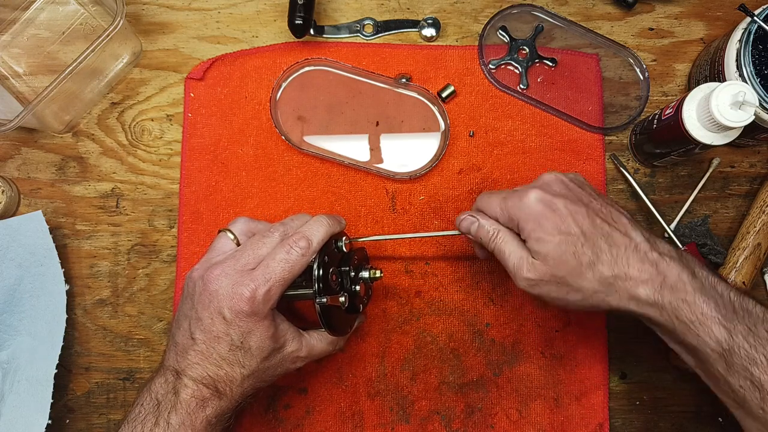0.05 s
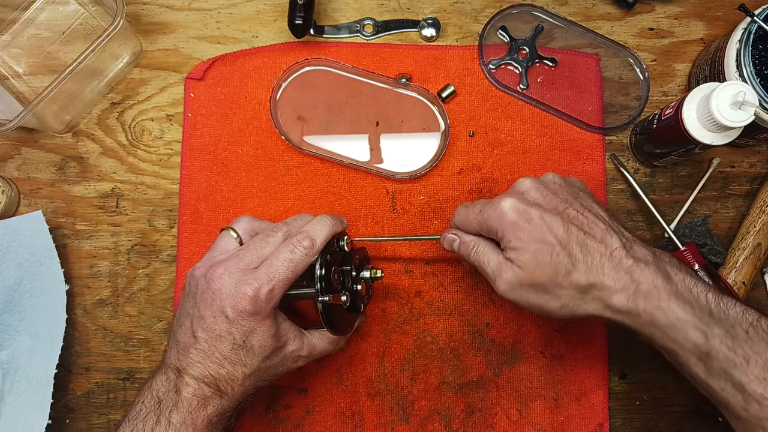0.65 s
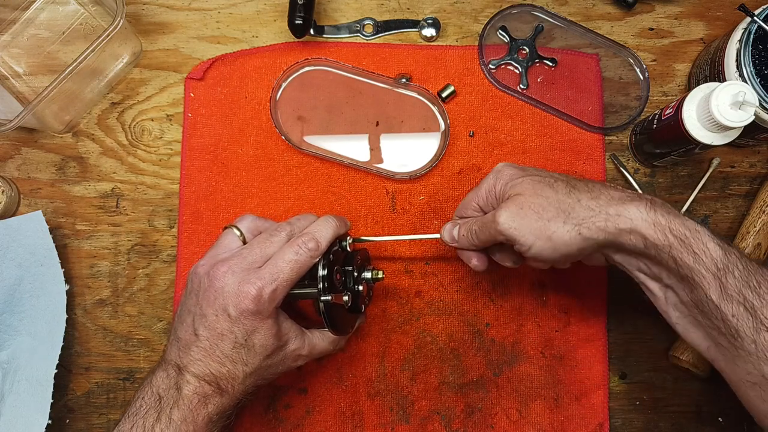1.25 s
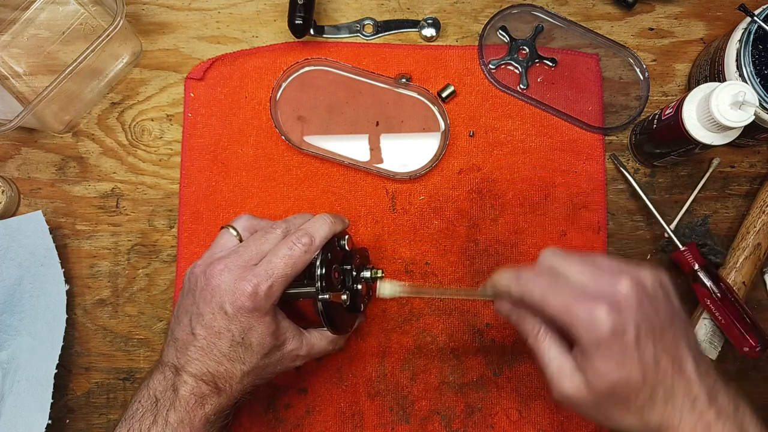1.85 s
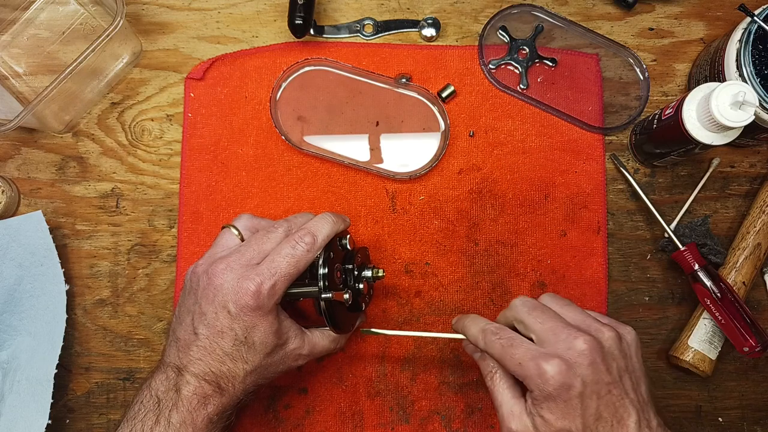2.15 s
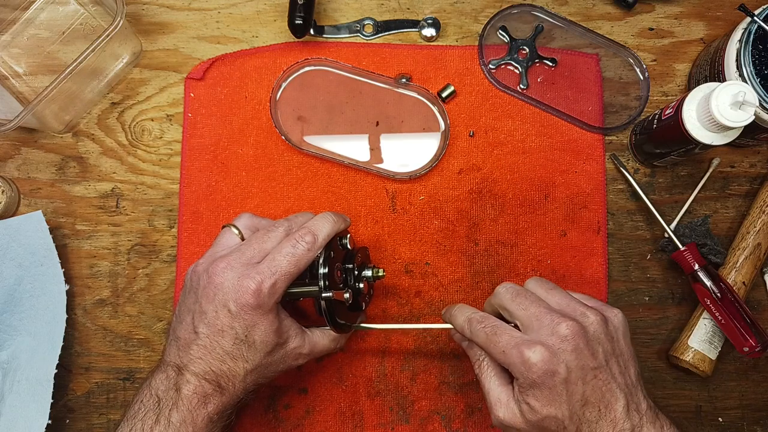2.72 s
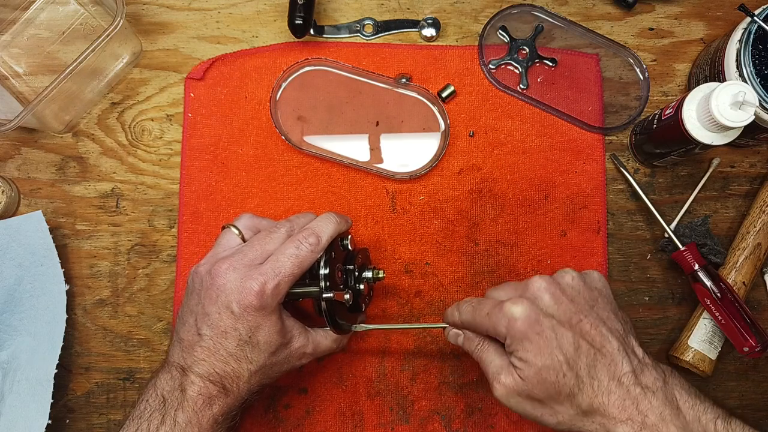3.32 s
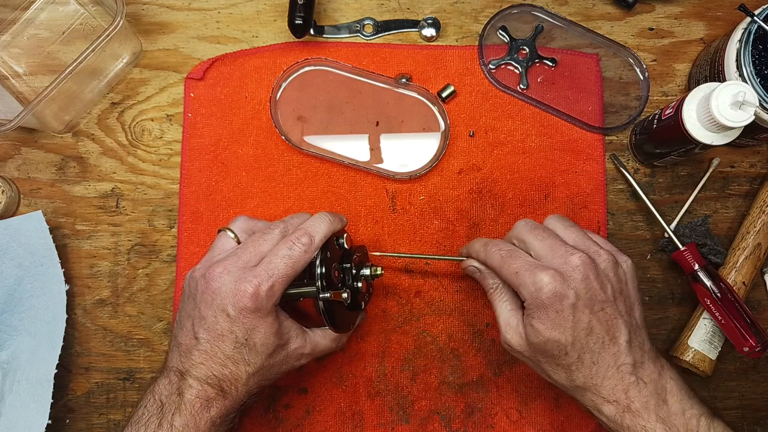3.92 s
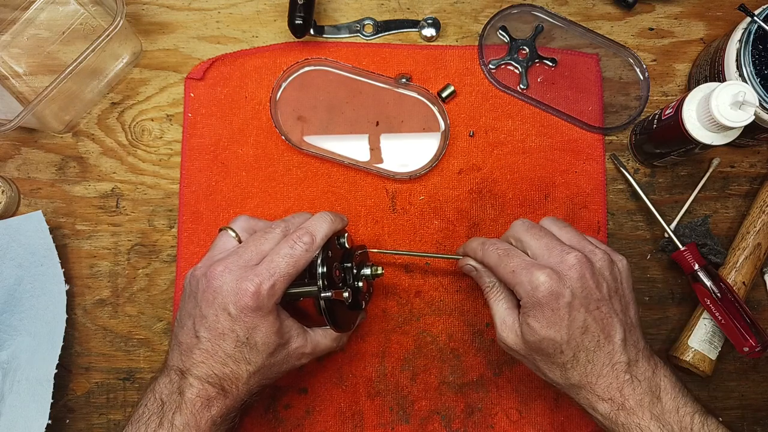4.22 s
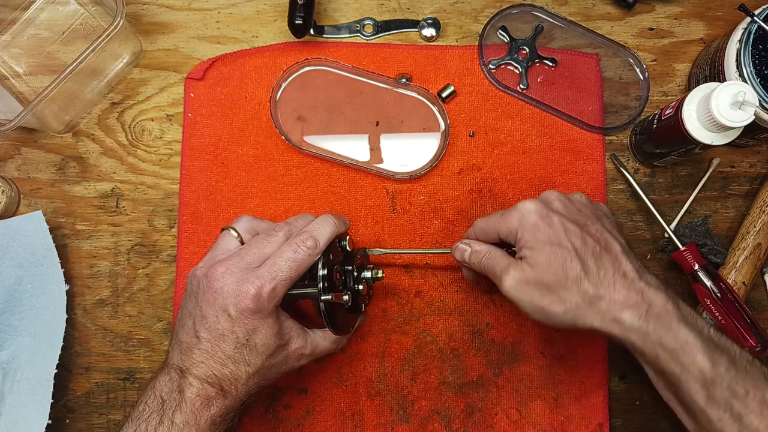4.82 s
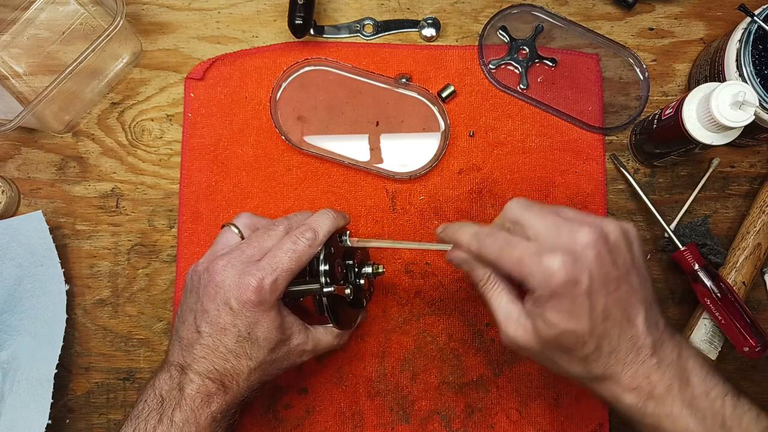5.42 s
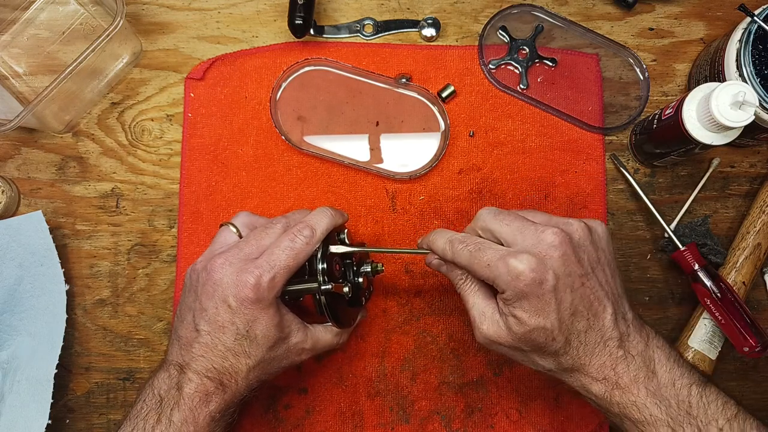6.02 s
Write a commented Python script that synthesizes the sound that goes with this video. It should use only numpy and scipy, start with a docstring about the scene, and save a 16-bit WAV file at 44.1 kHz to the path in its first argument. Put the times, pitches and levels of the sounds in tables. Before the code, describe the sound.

A fishing reel is cleaned with a thin swab stick at a wooden workbench, heard quietly through a close stereo microphone in a small dry room. In the first half second come a short rub and a few light metallic ticks. More ticks follow around 1.6 seconds, then a soft hand scuff and dull bench bump near 1.9. Small knocks land at about 2.4 and 2.7 seconds. Soft low bumps recur between 3 and 5 seconds, with a faint tick at 3.6. From 4.2 to 4.5 seconds, three firmer knocks make the reel ring briefly. The sharpest click comes near 5.7 seconds, followed by a short scrape and two more knocks by 6 seconds. Very faint thin squeaks occur near the start and end. Throughout, a low drone and rumble swell and sink under faint hiss and the slight slide of fingers.

```python
"""Screwdriver on a fishing reel

A wooden workbench in a small dry room, the reel on a cloth mat, a stereo microphone close by.
The small blade ticks on the screw heads and slips in their slots, knocking the reel into a short ring.
Hands and reel scuff softly, a dry thread squeaks, and the bench bumps as the hands shift their weight.
Underneath, a low drone and rumble swell and sink below the microphone's faint hiss."""
import sys
import numpy as np
from scipy import signal
from scipy.fft import rfft, irfft, next_fast_len
from scipy.io import wavfile
from scipy.ndimage import map_coordinates

SR = 44100
rng = np.random.default_rng(int(sys.argv[2]) if len(sys.argv) > 2 else 0)


def transcribe(u):
    """Save the signal u as a 16-bit wav file named by the first command-line argument.

    u: samples, shape (n,) or (channels, n), limited to [-1, 1]; the rate is SR.
    q: integer samples, one column per channel.
    """
    v = np.clip(np.atleast_2d(u).T, -1, 1)
    q = np.round(v * 32767).astype(np.int16)
    wavfile.write(sys.argv[1], SR, q)


N = 271656
TOP_HZ = 15830  # the recorder's band limit
# how alike the work sounds on left and right: (frequency [Hz], correlation [-1..1])
WORK_LIKENESS = [(300, 1), (650, 0.16), (1300, 0), (10000, 0)]


def amp(db):
    """Decibels to gain."""
    return 10 ** (np.asarray(db) / 20)


def unit(x):
    """x at rms 1."""
    return x / np.sqrt(np.mean(x ** 2) + 1e-20)


def along(points, hz):
    """(frequency [Hz], value) points read on a log axis."""
    f, v = np.transpose(points)
    return np.interp(np.log(hz + 1), np.log(f + 1), v)


def curve(rows):
    """(time [s], value) rows as one value per sample."""
    return np.interp(np.arange(N) / SR, *np.transpose(rows))


def wobble(rate, size):
    """A smooth random curve, rate knots a second."""
    return map_coordinates(rng.standard_normal(4096), [np.arange(size) * rate / SR], mode="wrap")


def filtered(x, response):
    """x through a filter whose gain is response(hz)."""
    size = x.shape[-1]
    padded = next_fast_len(size + 8192)
    return irfft(rfft(x, padded) * response(np.fft.rfftfreq(padded, 1 / SR)), padded)[..., :size]


def paired(x, likeness):
    """Two unrelated signals blended into left and right of a given correlation."""
    turn = lambda hz: np.arccos(np.clip(along(likeness, hz), -1, 1)) / 2
    mid, side = filtered(x, lambda hz: np.array([np.cos(turn(hz)), np.sin(turn(hz))]))
    return np.array([mid + side, mid - side])


def noise(colour, likeness, size):
    """Coloured stereo noise of rms 1."""
    coloured = filtered(rng.standard_normal((2, size)), lambda hz: amp(along(colour, hz)))
    return unit(paired(coloured, likeness))


def add(track, s, sound):
    """Mix a sound into the track at time s."""
    start = max(round(s * SR), 0)
    part = sound[:, :N - start]
    track[:, start:start + part.shape[1]] += part


def with_room(x, wet_db, build_s):
    """The direct sound and the small room's short tail, which builds up just behind it."""
    # the room's decay: (frequency [Hz], t60 [s])
    decay = [(150, 0.18), (500, 0.25), (2000, 0.26), (5000, 0.28), (12000, 0.2)]
    # the tail's spectrum: (frequency [Hz], gain [dB])
    colour = [(100, -7), (500, 5), (1800, 4.5), (4000, 0), (10000, -2.5)]
    hz, t, spectrum = signal.stft(rng.standard_normal((2, SR // 3)), SR, nperseg=256)
    fade = amp(along(colour, hz)[:, None] - 60 * t / along(decay, hz)[:, None])
    tail = signal.istft(spectrum * fade, SR, nperseg=256)[1]
    tail *= 1 - np.exp(-(np.arange(tail.shape[1]) / SR / build_s) ** 2)
    wet = signal.fftconvolve(x, tail / np.linalg.norm(tail[0]), axes=1)
    return x + amp(wet_db) * wet[:, :x.shape[1]]


def room_tone(drone_hz=72.07, waver_hz=3.96, throb_db=5, steady_db=-42, steadying_span_db=7.5):
    """A low drone that throbs more when weak, within a broad rumble and a dull, fluttering murk."""
    # swells of the three layers: (time [s], relative level [dB])
    drone_swell = [(0, -58), (0.22, -58.5), (0.35, -66), (1.0, -61), (1.3, -57.5), (1.45, -50), (1.9, -55),
                   (2.7, -54), (3.0, -54), (3.5, -48), (3.8, -57), (4.1, -47), (4.4, -58), (4.75, -62.5),
                   (5.1, -48.5), (5.32, -64), (5.45, -41.5), (6.16, -48)]
    rumble_swell = [(0, -63), (0.22, -57), (0.36, -68), (1.5, -61), (2.35, -60), (2.8, -54), (3.3, -53.5),
                    (3.85, -58.5), (4.1, -53), (4.4, -55), (4.7, -60.5), (5.25, -59), (5.7, -49),
                    (6.16, -55)]
    murk_swell = [(0.0, -79), (0.4, -84.5), (1.2, -82.5), (2.05, -75), (4.0, -75.5), (4.5, -70), (4.7, -81),
                  (5.35, -81), (6.0, -70), (6.16, -79)]
    # spectra of the two noises: (frequency [Hz], relative density [dB])
    rumble_colour = [(12, -15.5), (25, -11.5), (50, 2.5), (70, -0.5), (90, -1), (115, 1), (145, -4.5),
                     (175, -18), (250, -25.5), (500, -42.5), (1000, -104)]
    murk_colour = [(100, -10.5), (220, 5), (330, 2), (440, 2), (600, -7.5), (800, -8), (1200, -19.5),
                   (2500, -23.5), (6000, -34)]
    # how alike the room sounds on left and right: (frequency [Hz], correlation [-1..1])
    likeness = [(60, 0.67), (180, 0.88), (550, 0.48), (1650, -0.19), (4970, -0.68), (15000, -0.42)]
    unsteady = np.clip((steady_db - curve(drone_swell)) / steadying_span_db, 0.37, 1)
    pitch = drone_hz + waver_hz * unsteady * wobble(22, N)
    throb = amp(throb_db * unsteady * wobble(15, N))
    drone = amp(curve(drone_swell) - 1) * throb * unit(np.sin(2 * np.pi * np.cumsum(pitch) / SR))
    rumble = amp(curve(rumble_swell) + 2) * noise(rumble_colour, likeness, N)
    flutter_db = 2 * wobble(22, N)
    murk = amp(curve(murk_swell) + 2.5 + flutter_db) * noise(murk_colour, likeness, N)
    return drone + rumble + murk


def microphone_hiss(hiss_db=-77, whine_right_db=-15):
    """Microphone hiss and a thin electronic whine, both stronger on the left."""
    # the hiss spectrum: (frequency [Hz], left relative density [dB], right relative density [dB])
    colour = [(394, -18, -17), (1030, -1.5, -2), (1950, -4.5, -7.5), (5600, -11, -13.5),
              (7500, -7.5, -13.5), (8600, -5.5, -8), (10600, -4.5, -10.5), (13100, 1, -9), (15600, 0, -11)]
    # tones of the electronics: (frequency [Hz], level on the left [dB])
    tones = [(8000, -96), (9001, -103), (10002, -106)]
    sides = lambda hz: amp([along(np.array(colour)[:, [0, side]], hz) for side in (1, 2)])
    hiss = unit(filtered(rng.standard_normal((2, N)), sides))
    whine = sum(amp(db) * unit(np.sin(2 * np.pi * hz * np.arange(N) / SR)) for hz, db in tones)
    return amp(hiss_db) * hiss + np.array([whine, amp(whine_right_db) * whine])


def rubs(grain_db=1, grain_rate=350, skew=0.36):
    """Blade, hand and reel rub in short strokes that swell fast and fade, roughened by stick and slip."""
    # soft rubs: (time [s], length [s], blade scrape [dB], hand scuff [dB], reel groan [dB])
    strokes = [(0.0, 0.058, -80, -68.5, -46), (0.079, 0.025, -76, -99, -75), (0.176, 0.15, -82, -98, -70),
               (1.823, 0.13, -79.5, -60, -66), (1.875, 0.18, -83.5, -69.5, -68.5),
               (2.385, 0.1, -79.5, -73, -77.5), (2.474, 0.053, -75.5, -90, -80),
               (2.782, 0.022, -80, -65, -97), (3.548, 0.22, -80.5, -80.5, -77),
               (4.2, 0.055, -70.5, -77, -59.5), (4.33, 0.063, -75, -93, -56.5),
               (4.868, 0.074, -81.5, -106, -62), (5.682, 0.062, -61, -62, -52),
               (5.841, 0.055, -84, -76, -67), (5.941, 0.017, -91, -95, -49.5)]
    # spectra of blade, hand and reel: (frequency [Hz], relative density [dB])
    scrape = [(2000, -5), (4000, 1.5), (4800, -0.5), (5900, 4.5), (7500, -1), (9000, 4.5), (13000, -0.5),
              (16000, -11)]
    scuff = [(300, 12), (600, -11.5), (820, 5), (1000, -10.5), (1250, 6), (1650, 4.5), (1830, -9),
             (2050, -4.5), (2500, -20.5), (4000, -14), (8000, -28.5)]
    groan = [(180, -21), (300, 4), (365, 5.5), (470, 3), (565, -12.5), (700, -8.5), (1200, -54),
             (3000, -46.5)]
    track, size = np.zeros((2, N)), SR // 2
    for s, length, scrape_db, scuff_db, groan_db in strokes:
        swell = np.sin(np.pi * np.clip(np.arange(size) / SR / length, 0, 1) ** skew)
        grain = unit(amp(grain_db * wobble(grain_rate, size)))
        layers = [(scrape, scrape_db), (scuff, scuff_db), (groan, groan_db)]
        rub = sum(amp(db) * noise(colour, WORK_LIKENESS, size) for colour, db in layers)
        add(track, s, with_room(swell * grain * rub, wet_db=-9, build_s=0.0027))
    return track


def reel_ring(t, spread_db=0.5):
    """Reel and blade ring together, at new strengths and phases for each strike."""
    # their modes: (frequency [Hz], relative level [dB], t60 [s])
    modes = [(151, -2.5, 0.12), (239.5, -7.5, 0.077), (323, -12.5, 0.11), (356.5, 1, 0.078),
             (385, 0, 0.065), (455, 0, 0.076), (551.5, -1, 0.11), (597, -1, 0.044), (664, 1.5, 0.068),
             (742, -15, 0.068), (855, -10, 0.058), (938, -10.5, 0.15), (1043, -2.5, 0.048), (1211, 0, 0.03),
             (1487, -12, 0.049), (1557, -4, 0.064), (1720, -3, 0.079), (2114, -12.5, 0.096),
             (2534, -2.5, 0.057), (2785, -12.5, 0.12), (3175, -4, 0.061), (3420, 4, 0.026),
             (4100, -16, 0.14), (5440, -13.5, 0.034), (6100, -14, 0.027), (6990, -9, 0.017),
             (8700, -16, 0.042), (9100, -8.5, 0.029), (9820, -4, 0.011), (12030, -17, 0.034)]
    hz, db, t60 = np.transpose(modes)[:, :, None]
    # low modes reach left and right in step, high ones out of step
    offset = np.arccos(np.clip(along(WORK_LIKENESS, hz), -1, 1)) * rng.choice([-.5, .5], hz.shape)
    phase = rng.uniform(0, 2 * np.pi, hz.shape) + np.array([offset, -offset])
    fade = amp(db + spread_db * rng.standard_normal(hz.shape) - 60 * t / t60)
    return (fade * np.sin(2 * np.pi * hz * t + phase)).sum(axis=1)


def blow(t, levels_db, attack_s=0.00081, firm_db=-42):
    """One contact: a brief crack and the ringing reel, each register as strong as the blade drives it."""
    # the reel's registers, treble first:
    # (low edge [Hz], high edge [Hz], trim [dB], crack against ring [dB], crack t60 [s])
    registers = [(6000, 14000, -6, 0.5, 0.031), (2465, 4970, 1, 13.5, 0.039), (920, 2640, 0, 8.5, 0.12),
                 (121, 650, 2, 10, 0.16)]
    ring, hit = reel_ring(t), 0
    crack = paired(rng.standard_normal((2, len(t))), WORK_LIKENESS)
    onset = 1 - np.exp(-t / attack_s)
    # a gentle knock wakes only the lowest body modes, so the bass register narrows
    reach = [1, 1, 1, np.interp(levels_db[-1], [firm_db - 9, firm_db], [0.68, 1])]
    for (lo, hi, trim_db, crack_db, crack_t60), db, share in zip(registers, levels_db, reach):
        band = signal.butter(3, [lo, hi * share], "band", fs=SR, output="sos")
        part = signal.sosfilt(band, (ring + amp(crack_db - 60 * t / crack_t60) * crack) * onset)
        early_rms = np.sqrt(np.mean(part[:, :SR // 100] ** 2))
        hit += amp(db + trim_db) * part / early_rms
    return hit


def touched_part(t, hz, overtone_db, t60=0.046, overtone_ratio=2.13, width=0.0576, count=5):
    """The screw or post under the blade rings in a cluster of close modes and their overtones."""
    ring = np.zeros((2, len(t)))
    for centre_hz, db in [(hz, 0), (hz * overtone_ratio, overtone_db)]:
        detunes = np.linspace(-1, 1, count) + rng.uniform(-1.2, 1, count) / count
        for mode_hz in centre_hz * (1 + width * detunes):
            phase = rng.uniform(0, 2 * np.pi, (2, 1))
            ring += amp(db) * (centre_hz < TOP_HZ) * np.sin(2 * np.pi * mode_hz * t + phase)
    return ring * np.sqrt(2 / count) * amp(-60 * t / t60) * (1 - np.exp(-t / 0.00012))


def blade(lead_in_db=-12, lead_in_s=0.0055):
    """Light touches only tick; slips under pressure also knock the whole reel."""
    # blade contacts: (time [s], tip tick [dB], reel knock [dB], hollow clack lift [dB],
    # pitch of the touched part [Hz], its ring [dB], its overtone against that ring [dB])
    contacts = [(0.0034, -90, -61.5, 4, 4210, -66, -21), (0.092, -76.5, -61.5, -7.5, 3570, -74, -12),
                (0.1731, -77.5, -61.5, 0.5, 2190, -53, -22), (0.226, -71.5, -68.5, -6, 6630, -72, -20),
                (0.3915, -50, -71, -6.5, 1964, -59.5, 3.5), (1.609, -57.5, -75.5, -6, 2184, -61.5, -2),
                (1.6259, -65.5, -78, -7, 2240, -78, 12), (1.765, -74, -94, -3, 7400, -81, -6),
                (2.3528, -84.5, -56.5, -3, 1605, -56, -32), (2.6714, -63, -89, -4, 9350, -69, -20),
                (2.7064, -90, -60, 7.5, 1716, -56.5, -9), (3.568, -70, -88, -7, 2820, -75, -15),
                (3.5782, -59, -82, -6, 3550, -64, -23), (4.1607, -57.5, -45, -9.5, 1780, -59.5, -10),
                (4.404, -57, -41, -14.5, 1750, -58.5, -6), (4.474, -48.5, -37.5, -7.5, 1676, -60, 12.5),
                (5.253, -71.5, -89, -3.5, 5200, -73.5, -21), (5.6588, -39, -47, -12, 8750, -44.5, -20),
                (5.7592, -65.5, -49.5, -17.5, 648, -45, -16.5),
                (5.9534, -50.5, -40.5, -4.5, 3195, -48, -32)]
    track, t = np.zeros((2, N)), np.arange(SR // 4) / SR
    for s, tick_db, knock_db, clack_db, part_hz, ring_db, overtone_db in contacts:
        # the four registers step evenly from tick to knock; the clack shifts the middle two
        levels_db = np.linspace(tick_db, knock_db, 4) + clack_db * np.array([0, 1, 1, 0])
        hit = blow(t, levels_db) + amp(ring_db) * touched_part(t, part_hz, overtone_db)
        # a faint, soft lead-in just before each hit
        lead_in = np.minimum(t / lead_in_s, 1) * np.exp(-t / lead_in_s)
        add(track, s - lead_in_s, amp(lead_in_db) * lead_in * hit)
        add(track, s, with_room(hit, wet_db=-11.5, build_s=0.0039))
    return track


def fingers(flutter_db=2, flutter_rate=18, skew=0.5):
    """Fingers slide over the handle with a faint, uneven sheen that swells and fades."""
    # finger slides: (time [s], length [s], level [dB])
    slides = [(0.05, 0.38, -84), (1.5, 0.62, -81), (2.35, 2.1, -84), (4.2, 1.3, -86), (5.358, 1.1, -79)]
    # spectrum of sliding skin: (frequency [Hz], relative density [dB])
    colour = [(2000, -17), (5000, -13), (9000, -7.5), (13000, -3), (16000, -2.5)]
    t = np.arange(N) / SR
    swell = sum(amp(db) * np.sin(np.pi * np.clip((t - s) / length, 0, 1) ** skew)
                for s, length, db in slides)
    return swell * amp(flutter_db * wobble(flutter_rate, N)) * noise(colour, WORK_LIKENESS, N)


def thread_squeaks(waver=0.012):
    """A dry thread sings thinly as the screw starts to turn, then fades."""
    # faint squeaks: (time [s], time to fade by 20 dB [s], pitch [Hz], level [dB])
    squeaks = [(0.495, 0.2, 2820, -89.5), (5.598, 0.16, 3230, -84), (6.121, 0.1, 2820, -78.5),
               (6.114, 0.11, 3149, -83)]
    track, t = np.zeros((2, N)), np.arange(SR // 2) / SR
    for s, fade_s, hz, db in squeaks:
        envelope = np.minimum(t / 0.013, 1) * amp(db - 20 * t / fade_s)
        pitch = hz * (1 + waver * wobble(270, len(t)))
        tone = unit(np.sin(2 * np.pi * np.cumsum(pitch) / SR))
        add(track, s, with_room(np.tile(envelope * tone, (2, 1)), wet_db=-2, build_s=0.008))
    return track


def bench_bumps(hz=66.05, width_s=0.019):
    """The hands shift their weight: the bench gives a few soft, low swings."""
    # dull bumps through the wood: (time of the middle [s], level [dB])
    bumps = [(1.858, -44), (3.18, -44), (3.64, -43.5), (4.019, -45), (4.14, -41), (4.897, -41.5)]
    t = np.arange(N) / SR
    swing = lambda s: np.exp(-((t - s) / width_s) ** 2) * np.sin(2 * np.pi * (hz * t + rng.random()))
    return np.sqrt(2) * sum(amp(db) * swing(s) for s, db in bumps)


def scene():
    """From the microphone, the reel's knock leans right and the blade's treble left."""
    # where the work sits between the two sides: (frequency [Hz], left minus right [dB])
    balance = [(130, -2), (450, -2.5), (700, -6.5), (1300, 3.5), (4000, 3), (10000, 5.5)]
    work = blade() + thread_squeaks() + fingers() + rubs()
    work = filtered(work, lambda hz: amp(np.outer([.5, -.5], along(balance, hz))))
    return work + bench_bumps() + room_tone() + microphone_hiss()


def record(dry):
    """The recorder keeps nothing above its band limit."""
    return filtered(dry, lambda hz: hz < TOP_HZ)


dry = scene()
out = record(dry)
transcribe(out)
```